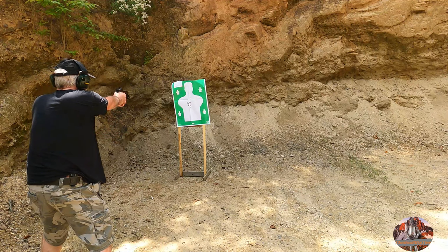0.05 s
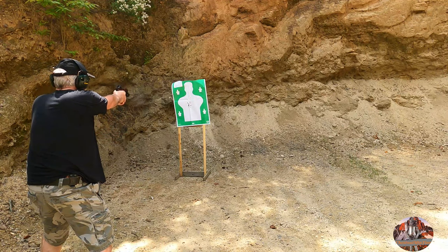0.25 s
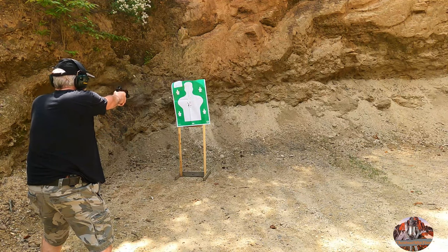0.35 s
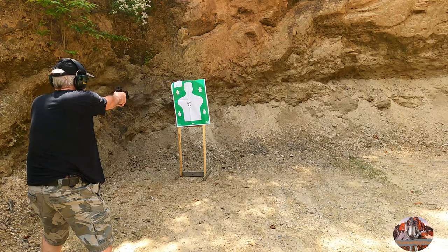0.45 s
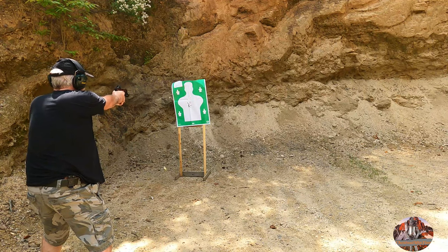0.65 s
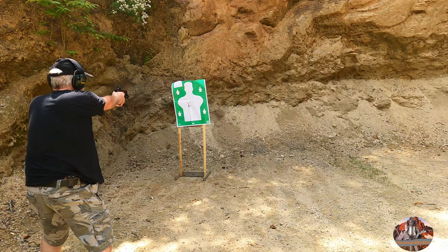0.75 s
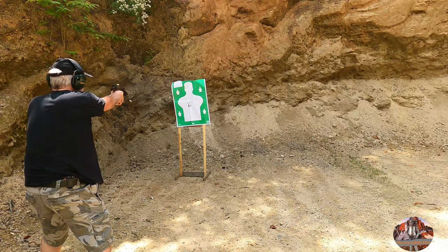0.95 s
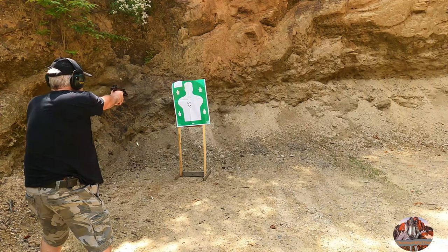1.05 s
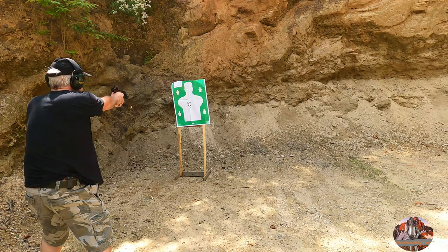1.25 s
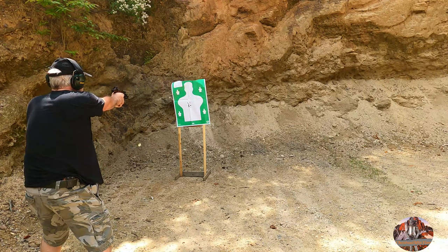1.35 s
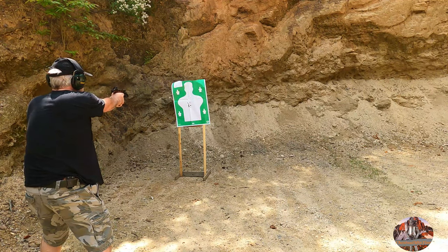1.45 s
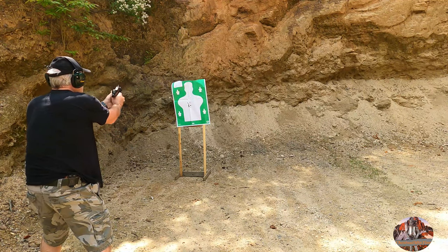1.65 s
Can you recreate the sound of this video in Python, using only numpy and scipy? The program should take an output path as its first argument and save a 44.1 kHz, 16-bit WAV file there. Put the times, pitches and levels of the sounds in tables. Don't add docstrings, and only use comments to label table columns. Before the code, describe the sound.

Three rapid pistol shots crack close by in an earth pit, with short booming echoes

```python
import sys
import numpy as np
from scipy import signal
from scipy.fft import rfft, irfft, next_fast_len
from scipy.io import wavfile
from scipy.ndimage import uniform_filter1d, map_coordinates

SR = 44100
rng = np.random.default_rng(int(sys.argv[2]) if len(sys.argv) > 2 else 0)


def wav_out(sig):
    wavfile.write(sys.argv[1], SR, np.round(np.clip(np.atleast_2d(sig).T, -1, 1) * 32767).astype(np.int16))


def linear_from_db(decibels):
    return 10 ** (np.asarray(decibels, float) / 20)


N = 74970
LONG = int(.8 * SR)

# [t/s, level/dB, far roll level/dB, buzz lead/s, buzz level/dB]
SHOTS = [
    (0.2705, 0.5, 1.5, 0.039, 1.5),
    (0.6897, -2, 0.5, 0.02, -5.5),
    (1.0754, 1.5, 0.5, 0.017, -3.5),
]
# [f/Hz, level/dB per Hz]
OLD_COLOUR = [(50, 3), (150, -1), (400, 1.5), (1000, -9), (3000, -12), (5000, -21), (13000, -42.5)]
# [t/s, level/dB]
OLD_FADE = [(0, 0.5), (.26, 1), (.3, -4), (.4, 13.5), (.52, 7.5), (.62, -8), (.7, -30)]
# [t/s, level/dB]
FLICKERS = [(0.2276, -15.5), (0.2316, -11.5)]
# [f/Hz, level/dB]
BUZZ_TONES = [(328.4, -13.5), (516.8, -15.5), (893.6, -14.5)]
# [f/Hz, level/dB]
BUZZ_COMB = [(140, -30), (700, -25), (1300, -31), (4700, -32), (5100, -51), (9000, -47.5), (9300, -53),
             (15500, -63)]
LOW_BUZZ_DB = [0, -9, -12]
WEAK_BUZZ_DB = [4.5, -9.5, -7]
BUZZ_SWELL = [1.2, 2.6, 1.8]
# [f/Hz, level/dB]
HOUSING = [(1050, 1), (1900, -1), (2900, -9), (4100, -5), (6600, -17), (11500, -24)]
# [f/Hz, level/dB]
CAPSULE = [(40, -32), (300, 2.5), (800, 12), (4500, 6.5), (9000, -43), (16000, -57)]
# [delay t/s, level/dB, spread/s]
NEAR = [(.0040, -12, .0007), (.0078, -17, .001), (.0122, -9, .0007), (.0143, -9, .0008)]
# [f/Hz, level/dB]
BANK = [(40, -43), (300, -2), (700, 4), (3000, 2), (5000, -18.5), (9000, -31), (16000, -29)]
# [delay t/s, f/Hz, level/dB, t60/s]
THUDS = [
    (.0015, 262, -1, .04),
    (0.057, 188, -15.5, 0.093),
    (.15, 271, -28, 0.26),
    (.275, 418, -20, 0.16),
    (.53, 613, -19.5, 0.14),
]
# [f/Hz, likeness 0-1]
REPEATS = [(300, .97), (1000, 0.73), (3000, 0.28), (7000, 0.6)]
# [t/s, level/dB, darkness 0-1]
PIT = [(.016, -26, 0), (.025, -15.5, .2), (.036, -12.5, .2), (.046, -10.5, .4), (.056, -13.5, .6),
       (.068, -18.5, 0.76), (.082, -26.5, .8), (.13, -33.5, 1), (.2, -54.5, 0.4)]
# [f/Hz, level/dB per Hz]
PIT_BRIGHT = [(50, -26), (200, -6.5), (600, 13.5), (1200, -4.5), (1700, -18), (4000, -39), (13000, -101.5)]
# [f/Hz, level/dB per Hz]
PIT_DARK = [(50, -35), (200, 0), (350, -0.5), (700, -52), (1100, -7.5), (4000, -47), (13000, -87.5)]
# [t/s, level/dB]
CRACKLE = [(.002, -13.5), (.02, -20.5), (.045, -17.5), (.06, -31.5), (.09, -36), (.16, -54), (.3, -90)]
# [f/Hz, level/dB]
LEDGES = [(500, 11.5), (1500, 5), (4000, 2.5), (8000, -18), (13000, -17)]
# [t/s, level/dB]
WOODS = [(.06, -24.5), (.11, -30), (.14, -24.5), (.2, -19.5), (.24, -23.5), (.35, -30.5), (.6, -48.5),
         (.8, -50)]
# [f/Hz, level/dB per Hz]
LEAVES = [(60, -29), (300, 3.5), (800, -6), (2400, 0), (5000, -6), (8000, -21), (13000, -28)]
# [t/s, level/dB]
ROLL = [(.12, -35.5), (.15, -24.5), (.26, -30.5), (.285, -28.5), (.31, -28.5), (.43, -30), (.55, -34),
        (.575, -36), (.8, -70)]
# [f/Hz, level/dB per Hz]
SLOPES = [(50, -32), (150, -16.5), (300, -10), (600, -3), (1200, -9), (4500, -22), (13000, -80)]
# [t/s, level/dB, f/Hz, t60/s]
CASE = (1.482, -37, 11500, .012)
# [f/Hz, level/dB]
MIC = [(30, -23), (90, -2.5), (8000, -3), (9100, -9), (10200, -7.5), (12000, 1.5), (13300, -17),
       (14500, -42)]
# [t/s, level/dB]
GAIN = [(0, 1), (.27, -0.5), (.4, -3.5), (.5, -5), (.6, 2.5), (.68, 5), (.72, 1.5), (.9, 1), (1.05, 1.5),
        (1.1, -0.5), (1.4, -3), (1.62, -1), (1.7, 2)]
# [f/Hz, level/dB]
RUMBLE_CUT = [(20, -20), (70, -8.5), (140, 1), (8000, -0.5), (9100, -6), (10200, -0.5), (13500, -6.5),
              (15000, -18)]
# [f/Hz, level/dB]
WIDE = [(2500, -50), (5000, -33.5), (10000, -28.5), (11500, -15), (13000, -19), (14000, -40)]


def unit(x):
    return x / np.sqrt(np.mean(x ** 2) + 1e-20)


def along(points, hz):
    f, v = np.transpose(points)
    return np.interp(np.log(hz + 1), np.log(f + 1), v)


def curves(rows, n):
    s, *cols = np.transpose(rows)
    return [np.interp(np.arange(n) / SR, s, c, left=c[0]) for c in cols]


def level(rows, n):
    return linear_from_db(curves(rows, n)[0])


def filtered(x, response):
    n = x.shape[-1]
    m = next_fast_len(n + 8192)
    return irfft(rfft(x, m) * response(np.fft.rfftfreq(m, 1 / SR)), m)[..., :n]


def causal(x, points):
    cepstrum = irfft(np.log(linear_from_db(along(points, np.fft.rfftfreq(4096, 1 / SR)))))
    cepstrum[1:2048] *= 2
    cepstrum[2049:] = 0
    return signal.fftconvolve(x, irfft(np.exp(rfft(cepstrum))))[:len(x)]


def add(bus, x, s):
    i = round(s * SR)
    bus[i:i + len(x)] += x[:len(bus) - i]


def earlier_fire():
    roll = filtered(rng.standard_normal(N), lambda hz: linear_from_db(along(OLD_COLOUR, hz)))
    return linear_from_db(-37) * unit(roll) * level(OLD_FADE, N)


def flicker(db):
    t = np.arange(400) / SR
    return causal(linear_from_db(db - 60 * t / .009) * rng.standard_normal(400), CAPSULE)


def buzz(lead, db, low_db, weak_db, swell):
    t = np.arange(round(lead * SR)) / SR - lead
    hz, tone_db = np.transpose(BUZZ_TONES)
    phase = 0.1 * rng.random((len(hz), 1))
    strong = linear_from_db(tone_db + 5 + low_db * (hz < 600)) @ np.cos(2 * np.pi * (hz[:, None] * t + phase))
    spacing_hz = 93.75
    comb = (np.arange(1, 165) + .5) * spacing_hz
    size, turn = rng.standard_normal((2, len(comb)))
    ripple_db = 2.9 * np.cos(2 * np.pi * comb / spacing_hz / 3)
    comb_db = along(BUZZ_COMB, comb) + weak_db + 3.66 * size + ripple_db
    cycles = comb[:, None] * (t + .009) + .08 * turn[:, None]
    weak = linear_from_db(comb_db) @ np.cos(2 * np.pi * cycles)
    rise = np.sin(np.pi * .62 * (1 + t / lead)) ** swell
    return linear_from_db(db) * (strong + weak) * rise * np.clip(-t / 0.001, .3, 1)


def terrain():
    same, fresh = rng.standard_normal(LONG), rng.standard_normal((len(SHOTS), LONG))

    def like(hz):
        return np.clip(along(REPEATS, hz), 0, 1)

    fixed_ground = filtered(same, lambda hz: np.sqrt(like(hz)))
    return fixed_ground + filtered(fresh, lambda hz: np.sqrt(1 - like(hz)))


def muzzle_crack(grain, t):
    edge_s = .0003
    short = np.clip(t / edge_s, 0, 1) * np.clip((.0017 - t) / edge_s, 0, 1)
    ring = 0
    for hz, db in HOUSING:
        ring = ring + linear_from_db(db) * np.sin(2 * np.pi * (hz * t - .15 + 0.081 * rng.standard_normal()))
    return short * ring + causal(grain * linear_from_db(-4.5) * short, CAPSULE)


def near_surfaces(grain, t):
    bursts = sum(linear_from_db(db) * np.exp(-((t - s) / spread) ** 2) for s, db, spread in NEAR)
    return causal(grain * linear_from_db(6) * bursts, BANK)


def ground_thuds(t):
    thud = 0
    for s, hz, db, t60 in THUDS:
        u = np.clip(t - s, 0, None)
        onset = 1 - np.exp(-u / (0.0035 + 0.058 * s))
        thud = thud + linear_from_db(db - 60 * u / t60) * np.sin(2 * np.pi * hz * u) * onset
    return thud


def blast(grain):
    t = np.arange(LONG) / SR
    return muzzle_crack(grain, t) + near_surfaces(grain, t) + ground_thuds(t)


def coloured(noise, spectrum, patchy_db, even_s):
    x = unit(filtered(noise, lambda hz: linear_from_db(along(spectrum, hz))))
    power = np.abs(uniform_filter1d(x ** 2, max(int(even_s * SR), 9), axis=-1))
    x = x / np.sqrt(power + 0.032)
    patch_hz = 120
    patches = rng.standard_normal(int(LONG * patch_hz / SR) + 4)
    return x * linear_from_db(patchy_db * map_coordinates(patches, [np.arange(LONG) * patch_hz / SR]))


def ledges():
    hits = rng.random(LONG) < 1900 / SR
    glints = hits * linear_from_db(5 * rng.exponential(size=LONG))
    spikes = terrain() * (0.78 + glints)
    return level(CRACKLE, LONG) * coloured(spikes, LEDGES, patchy_db=2.3, even_s=0.02)


def pit_walls():
    pit_db, dark = curves(PIT, LONG)
    dark = np.clip(dark, 0, 1)
    bright_boom = coloured(terrain(), PIT_BRIGHT, patchy_db=1.5, even_s=.008)
    dark_boom = coloured(terrain(), PIT_DARK, patchy_db=3.8, even_s=0.0116)
    return linear_from_db(pit_db) * (np.sqrt(1 - dark) * bright_boom + np.sqrt(dark) * dark_boom)


def woods():
    return level(WOODS, LONG) * coloured(terrain(), LEAVES, patchy_db=0.5, even_s=0.015)


def far_slopes():
    roll_db = curves(ROLL, LONG)[0] + np.array(SHOTS)[:, 2:3]
    return linear_from_db(roll_db) * coloured(terrain(), SLOPES, patchy_db=0.5, even_s=0.024)


def echoes():
    start = np.arange(LONG) > .002 * SR
    return start * (ledges() + pit_walls() + woods() + far_slopes())


def spent_case(db, hz, t60):
    t = np.arange(900) / SR
    rough = 1 + 0.79 * rng.standard_normal(900)
    return linear_from_db(db - 60 * t / t60) * np.sin(2 * np.pi * hz * t) * rough


def scene():
    t = np.arange(N) / SR
    out = earlier_fire()
    for s, db in FLICKERS:
        add(out, flicker(db), s)
    tails, grains = echoes(), terrain()
    for k, (s, db, _, lead, buzz_db) in enumerate(SHOTS):
        one = np.zeros(N)
        add(one, linear_from_db(db) * (blast(grains[k]) + tails[k]), s)
        if k + 1 < len(SHOTS):
            duck_s = 0.0029
            one *= np.clip((SHOTS[k + 1][0] - t) / duck_s, .05, 1)
        add(one, buzz(lead, buzz_db, LOW_BUZZ_DB[k], WEAK_BUZZ_DB[k], BUZZ_SWELL[k]), s - lead)
        out += one
    s, db, hz, t60 = CASE
    add(out, spent_case(db, hz, t60), s)
    return np.array([out, out])


def top_cut(x):
    return signal.sosfilt(signal.butter(12, 16700, fs=SR, output="sos"), x)


def record(dry):
    x = causal(dry[0], MIC) * level(GAIN, N)
    top, hard = 1.0, 8
    x = x / (1 + np.abs(x / top) ** hard) ** (1 / hard)
    x = causal(x, RUMBLE_CUT)
    wander = unit(uniform_filter1d(rng.standard_normal(N), 60))
    side = filtered(x * wander, lambda hz: linear_from_db(along(WIDE, hz)))
    return top_cut(np.array([x + side, x - side]))


dry = scene()
out = record(dry)
wav_out(out)
```